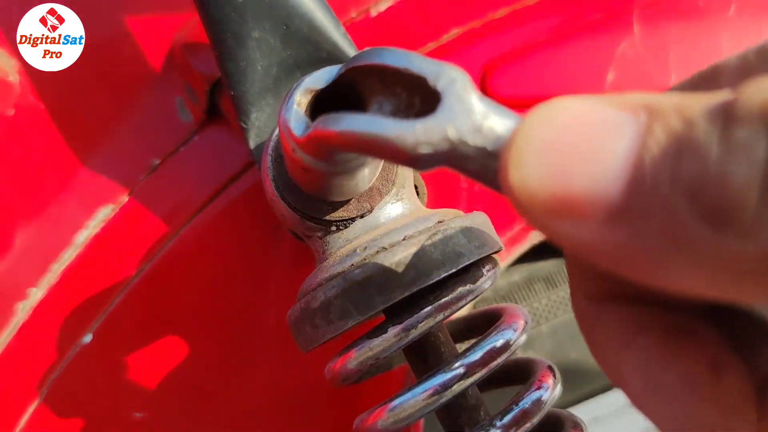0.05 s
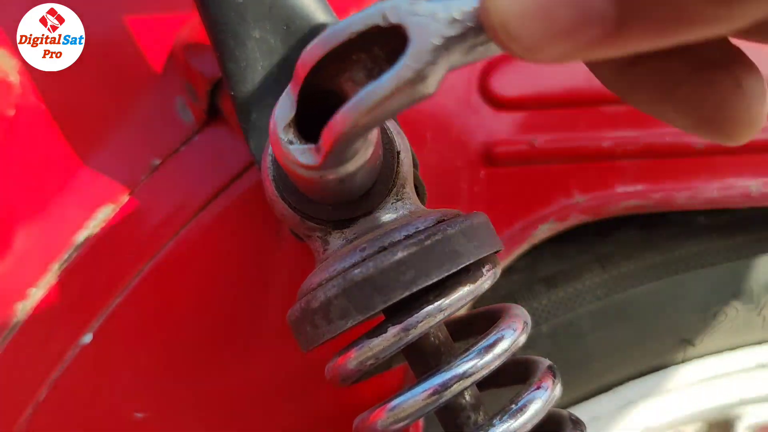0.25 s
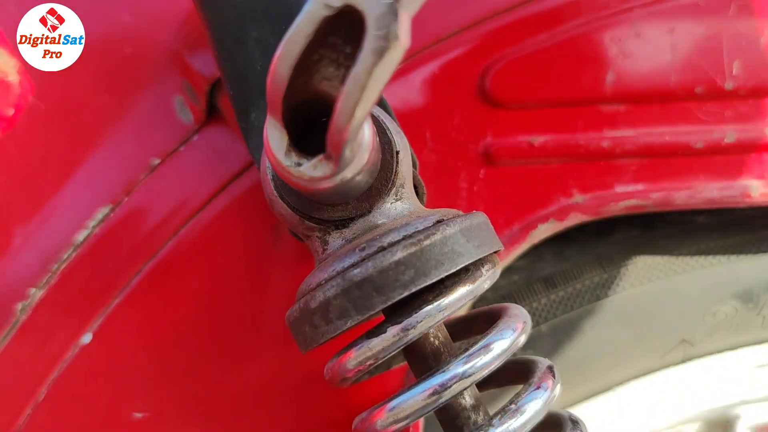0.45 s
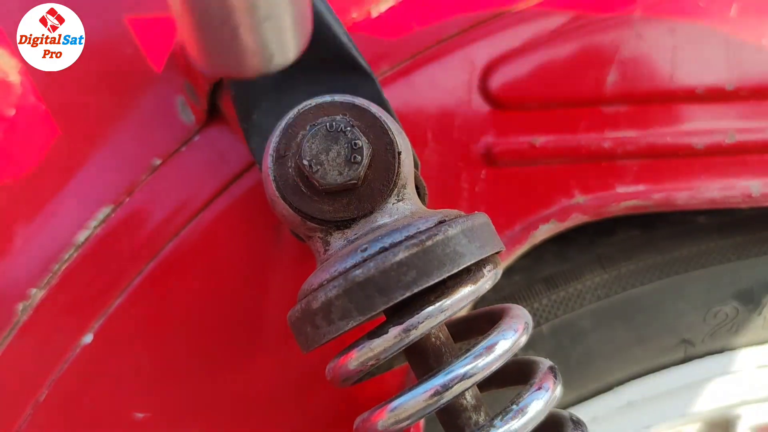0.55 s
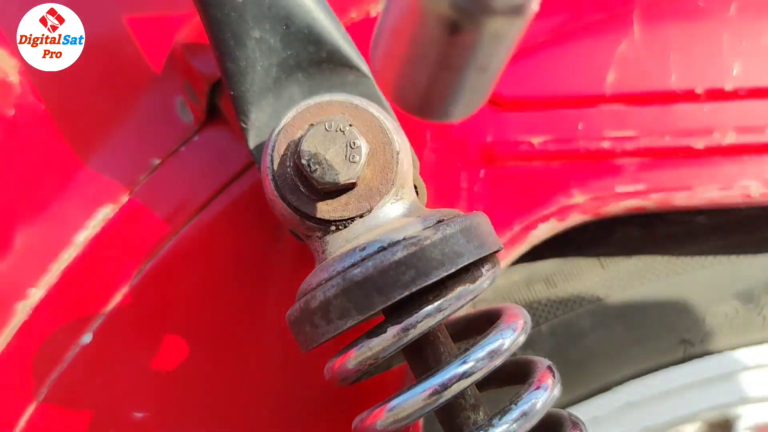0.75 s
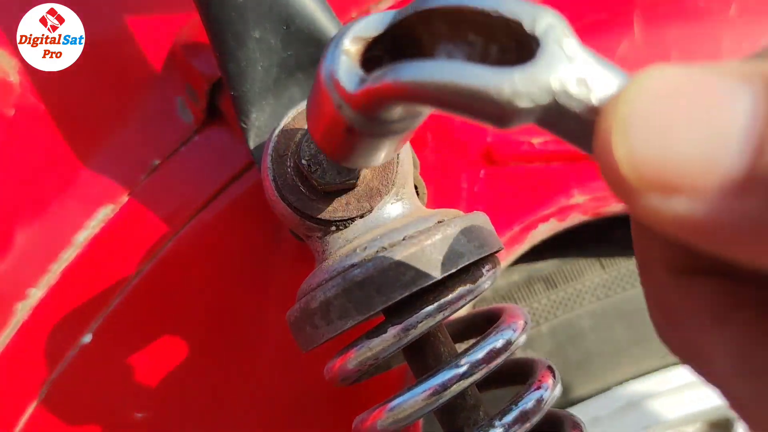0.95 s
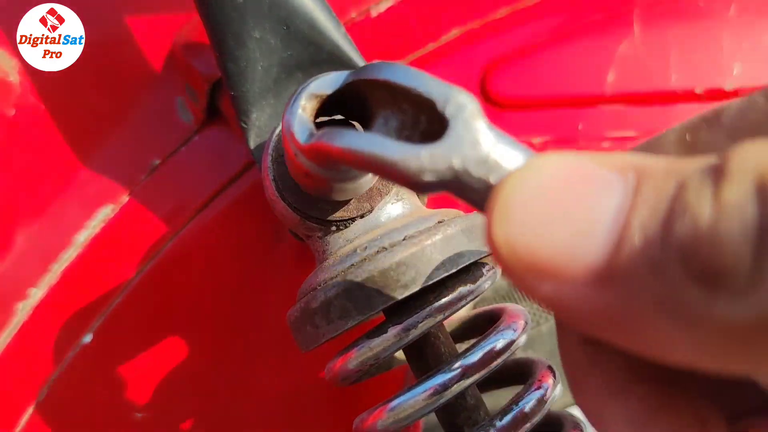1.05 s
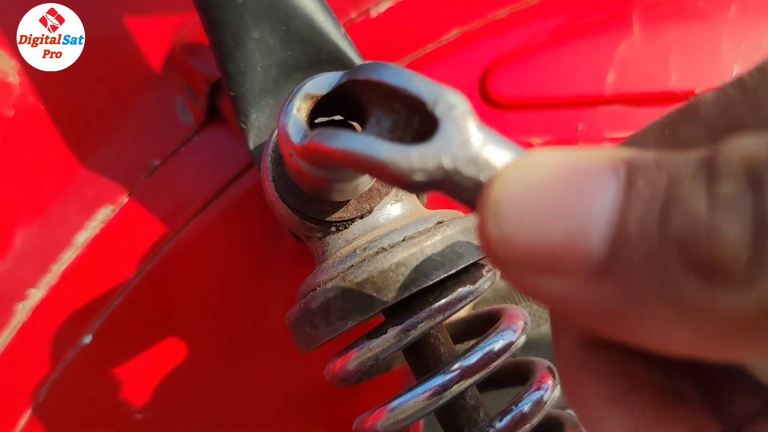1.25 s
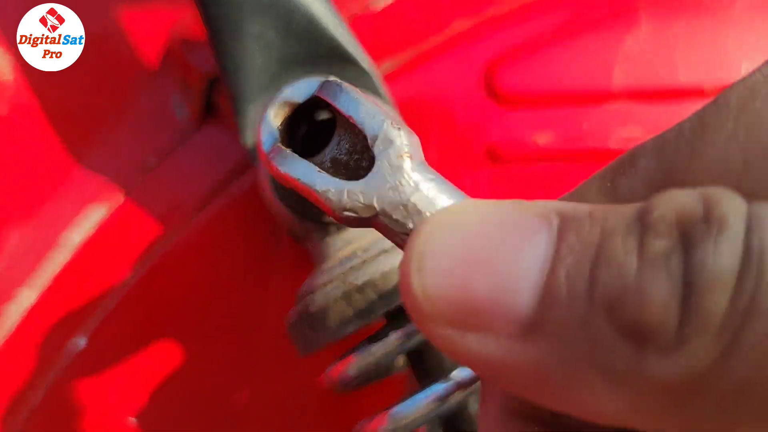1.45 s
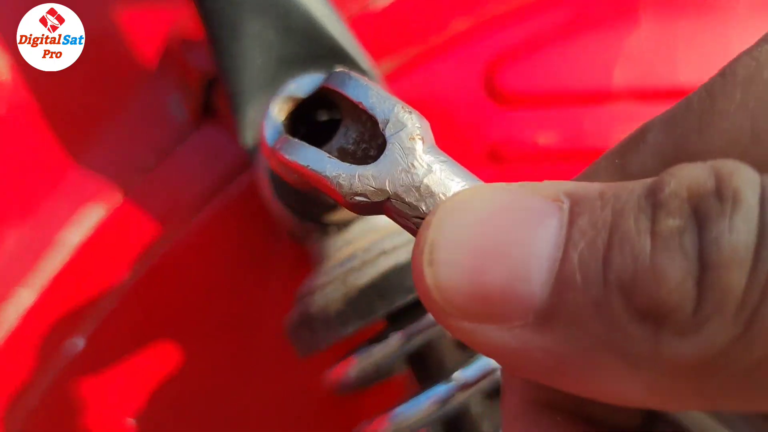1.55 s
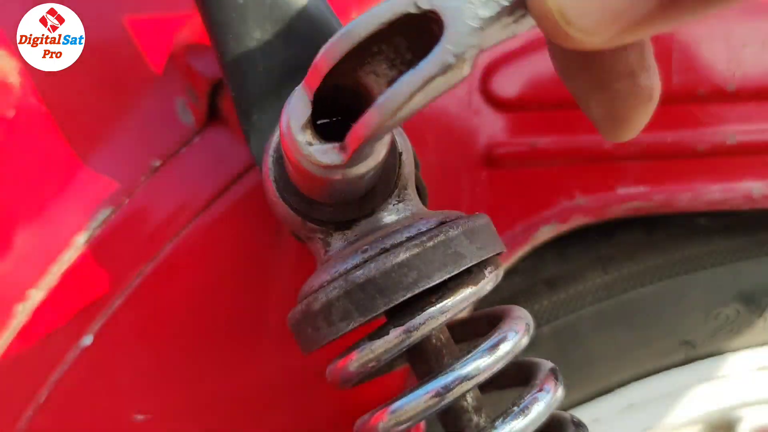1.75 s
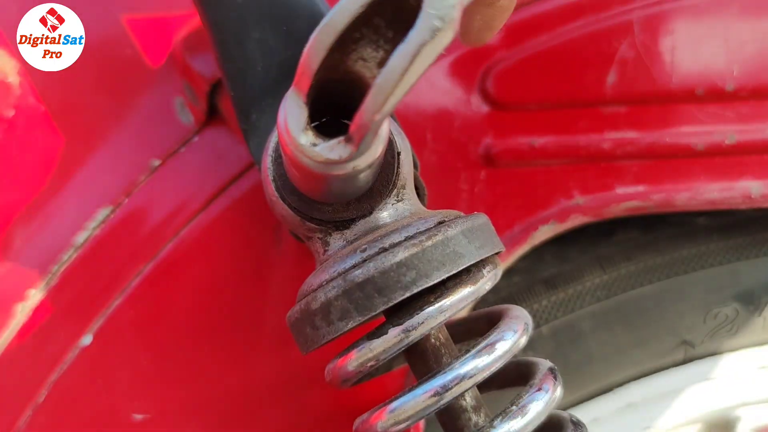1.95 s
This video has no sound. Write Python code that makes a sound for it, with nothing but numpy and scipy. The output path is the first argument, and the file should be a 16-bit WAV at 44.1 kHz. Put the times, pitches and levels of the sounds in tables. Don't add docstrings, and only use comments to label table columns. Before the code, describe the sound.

Metal socket tool clicks and knocks on a vehicle bolt, dry scrapes, faint dove cooing behind

```python
import sys
import numpy as np
from scipy import signal
from scipy.fft import rfft, irfft, next_fast_len
from scipy.io import wavfile
from scipy.ndimage import uniform_filter1d

SR = 44100
rng = np.random.default_rng(int(sys.argv[2]) if len(sys.argv) > 2 else 0)


def dump(signal):
    limited = np.clip(np.atleast_2d(signal).T, -1, 1)
    pcm = np.round(limited * 32767).astype(np.int16)
    wavfile.write(sys.argv[1], SR, pcm)


def voltage_ratio(decibels):
    exponent = np.asarray(decibels, float) / 20
    return 10 ** exponent


N = 88244


def unit(x):
    return x / np.sqrt(np.mean(x ** 2))


def band(x, hz, width):
    return signal.lfilter(*signal.iirpeak(min(hz, .45 * SR), hz / width, fs=SR), x)


def level_at(hz, points):
    p = np.array(points)
    return np.interp(np.log(hz), np.log(p[:, 0]), p[:, 1])


def colour(x, points):
    size = next_fast_len(N + 4096)
    f, p = np.arange(1025) * SR / 2048, np.array(points)
    log_gain = np.log(voltage_ratio(np.interp(np.log(f + 1), np.log(p[:, 0]), p[:, 1])))
    cepstrum = irfft(log_gain)
    cepstrum[1:1024] *= 2
    cepstrum[1025:] = 0
    response = rfft(irfft(np.exp(rfft(cepstrum))), size)
    return irfft(rfft(x, size) * response, size)[..., :N]


def walk(rate):
    k = int(SR / rate)
    steps = np.repeat(rng.standard_normal(N // k + 1), k)
    return 1.3 * uniform_filter1d(uniform_filter1d(steps, k), k)[:N]


# (start [s], length [s], level [dB], centre [Hz])
RUBS = [(-.05, 0.14, -44.5, 700), (0.214, 0.015, -47, 10800), (0.326, 0.1, -55, 8800),
        (0.066, 0.088, -54.5, 9000), (0.069, 0.17, -62, 3000), (0.2, 0.29, -72, 3800),
        (0.246, 0.23, -97, 8340), (0.434, 0.29, -65, 4560), (0.45, 0.21, -62.5, 7800),
        (1.38, 0.045, -77, 1900), (1.446, 0.11, -55, 8100), (1.656, 0.32, -67, 3210),
        (1.684, 0.28, -56.5, 9440), (1.961, 0.059, -63, 8600)]


def rubbing():
    grain_db, relative_width = 2.2, 0.56
    t, out = np.arange(N) / SR, 0
    grain_size = voltage_ratio(grain_db * rng.exponential(size=N) + 2.5 * walk(60))
    grains = unit(grain_size * rng.standard_normal((2, N)))
    for s, length, db, hz in RUBS:
        u = np.clip((t - s) / length, 0, 1)
        swell = np.sin(np.pi * u ** 0.62) ** 1.57
        width = relative_width * hz
        out = out + voltage_ratio(db) * swell * unit(band(band(grains, hz, width), hz, width))
    return out


# (pitch [Hz], density [dB per Hz])
TOWN = [(30, -9.5), (75, -2.5), (125, -2.5), (280, -6.5), (520, -14.5), (1200, -25), (4000, -35),
        (15000, -22)]
# (time [s], level [dB])
TOWN_GAIN = [(0, 3.5), (.3, 5), (.6, 1.5), (.89, -0.5), (.96, -1), (1.3, 0.5), (2, -1)]
# (centre [Hz], width [Hz], level [dB])
HUM = [(75.2, 9.5, -8), (117.6, 12, -8)]


def town():
    town_db, alike_hz = -57, 450
    out, gain = 0, np.array(TOWN_GAIN)
    for hz in 30 * 2 ** np.arange(0, 9.3, .5):
        mid, side = (unit(band(band(rng.standard_normal(N), hz, hz / 2), hz, hz / 2)) for _ in range(2))
        db = level_at(hz, TOWN) + 10 * np.log10(hz / 75) + 0.59 * walk(7.9)
        alike = 1 / (1 + (hz / alike_hz) ** 2)
        both = np.sqrt(1 + alike) * mid
        differ = np.sqrt(1 - alike) * side * np.array([[1], [-1]])
        out = out + voltage_ratio(db) * (both + differ)
    hum = sum(voltage_ratio(db) * unit(band(rng.standard_normal(N), hz, w)) for hz, w, db in HUM)
    return (unit(out) + hum) * voltage_ratio(town_db + np.interp(np.arange(N) / SR, gain[:, 0], gain[:, 1]))


# (time [s], loss [dB])
GRIPS = [(0.079, 11), (0.103, -2), (0.136, 16), (0.148, -11), (.18, 28), (.54, 3), (1.079, 9), (1.123, 5),
         (1.399, 8), (1.428, 8), (1.452, 20), (1.473, 8), (1.531, 4), (1.546, 9), (1.879, 8)]


def ring(x, modes):
    grip_s, longest_t60_s = 0.0013, .15
    chatter_db, chatter_rate = 2.2, 120
    port_turn, port_scatter, apart_hz = 2.39, 1, 763
    t, out = np.arange(N) / SR, 0
    choke = voltage_ratio(-sum(abs(db) * np.clip((t - s) / grip_s, 0, 1) for s, db in GRIPS))
    for k, (hz, db, t60) in enumerate(modes):
        longest = longest_t60_s * min(1, np.sqrt(900 / hz))
        r = np.exp(-np.log(1000) / (np.clip(t60, .005, longest) * SR))
        tone = choke * signal.lfilter([1], [1, -r * np.exp(2j * np.pi * hz / SR)], x / choke)
        tone = (-1) ** k * voltage_ratio(db + chatter_db * walk(chatter_rate)) * tone
        apart = (port_turn + (-1) ** (k // 2) * port_scatter) / (1 + (apart_hz / hz) ** 6)
        left = (tone * np.exp(.5j * apart)).imag
        right = (tone * np.exp(-.5j * apart)).imag
        out = out + np.array([left, right])
    return out


# (pitch [Hz], level [dB], time to fall 60 dB [s])
TOOL = [(2250, -9, 0.036), (2420, -1.5, 0.12), (2664, 2.5, 0.035), (2835, -4, 0.028), (2943, -5, 0.049),
        (3120, -8, .05), (3240, -2, 0.054), (3680, -9, 0.024), (3865, 4, 0.028), (4190, -12, 0.042),
        (5310, -12, 0.025), (5600, -8, .03), (8270, -8, 0.016), (14200, -27, .04)]
# (centre [Hz], width [Hz], level [dB])
GRIT = [(1060, 390, 6.5), (3000, 5960, 4.5), (7910, 620, 4.5), (13440, 5000, 0)]


def contacts(rows, panel):
    push_s, tick_s = 0.00039, .00008
    softer_when_weak = 0.47
    t = np.arange(N) / SR
    push, tick, spray = np.zeros(N), np.zeros(N), np.zeros(N)
    for s, panel_db, tool_db, grit_db, length in rows:
        i = int(s * SR)
        span = slice(i, i + 8000)
        u = t[span] - s + 1 / SR
        soft_s = push_s * voltage_ratio(-softer_when_weak * (panel_db + 28.5))
        push[span] += voltage_ratio(panel_db) * np.exp(-u / soft_s) / (soft_s * SR)
        tick[span] += voltage_ratio(tool_db) * np.exp(-u / tick_s) / (tick_s * SR)
        spray[span] += voltage_ratio(grit_db) * np.exp(-u / max(length, .001))
    grains = rng.standard_normal((2, N)) * voltage_ratio(2.9 * rng.exponential(size=N))
    grit = spray * unit(grains)
    grit_sound = sum(voltage_ratio(db) * band(grit, hz, w) for hz, w, db in GRIT)
    panel_ring = ring(push + voltage_ratio(-30) * grit[0], panel)
    tool_ring = ring(tick + voltage_ratio(-48) * grit[0], TOOL)
    return panel_ring + tool_ring + voltage_ratio(-3.5) * grit_sound


# (pitch [Hz], level [dB], time to fall 60 dB [s])
PANEL_DROP = [(197, -14, 0.092), (407, -16, 0.067), (454, -3.5, 0.067), (496, -1, 0.033),
              (551, -5.5, 0.061), (623.8, -5, 0.17), (749, -15, 0.083), (780, -10.5, 0.1), (843, -8, 0.048),
              (1028, -4, 0.18), (1264, -16, 0.1), (1425, -21.5, 0.11), (1970, -14.5, .08)]
# (time [s], panel level [dB], tool level [dB], grit level [dB], grit length [s])
DROPS = [(.001, -36, -70, -79, 0.03), (.0075, -43.5, -63, -70, .01), (.026, -39.5, -73, -79.5, .01),
         (1.0605, -20, -23, -23, 0.0034), (1.0632, -32.5, -26, -27.5, 0.0045),
         (1.066, -39, -18.5, -26, 0.0038), (1.0695, -35.5, -24, -38, 0.005),
         (1.0728, -20, -32.5, -29.5, 0.004), (1.0805, -34, -43, -39, .005),
         (1.086, -25.5, -49, -48, 0.0074), (1.094, -34.5, -46, -43, 0.0068),
         (1.101, -33.5, -53, -55, 0.0051), (1.118, -29.5, -60, -51.5, 0.0061)]


def socket_drops():
    return contacts(DROPS, PANEL_DROP)


# (pitch [Hz], level [dB], time to fall 60 dB [s])
PANEL_TURN = [(201, -13.5, 0.055), (455, -17.5, 0.023), (495.6, -1, 0.049), (667, -8, 0.021),
              (779, -10, 0.05), (1010, -6.5, 0.098), (1168, -12.5, 0.042), (1277, -16.5, 0.073),
              (1390, -12, 0.06), (1712, -14, 0.05), (2034, -18.5, 0.08), (2420, -14, .06),
              (2740, -25, 0.044), (2923, -24.5, .03)]
# (time [s], panel level [dB], tool level [dB], grit level [dB], grit length [s])
TURNS = [(.067, -34.5, -81, -68, 0.02), (.087, -33.5, -65, -57, 0.03), (.0925, -33.5, -73, -68, .01),
         (.11, -30, -46, -39, 0.0044), (.1153, -19, -45, -43, 0.0032), (.1205, -36, -45, -50, 0.0061),
         (.1277, -45.5, -57, -47.5, 0.018), (.1335, -22, -56.5, -56, 0.0043),
         (.1395, -32.5, -61.5, -49, 0.0039), (.145, -26, -61, -47, 0.0064), (.152, -30, -65.5, -52.5, .006),
         (.1585, -34.5, -64, -44, 0.0057), (.162, -31, -60.5, -48, .005), (.167, -23, -52, -47, 0.006),
         (.198, -39.5, -66, -57, 0.0072), (.218, -39, -69, -65, .006)]


def socket_turns():
    return contacts(TURNS, PANEL_TURN)


def whistles(rows, wobble):
    t, out, drift = np.arange(N) / SR, np.zeros(N), walk(35.9)
    for s, length, hz, end_hz, db in rows:
        u = np.clip((t - s) / length, 0, 1)
        f = (hz + (end_hz - hz) * u) * (1 + wobble * drift)
        swell = voltage_ratio(db - 6 + 2.1 * drift) * np.sin(np.pi * u) ** 0.5
        out += swell * np.sin(2 * np.pi * np.cumsum(f) / SR)
    return out


# (start [s], length [s], start pitch [Hz], end pitch [Hz], level [dB])
CHIRPS = [
    (.105, 0.081, 14200, 14250, -70),
    (.97, 0.078, 3700, 3680, -76),
    (1.0, 0.036, 3600, 3000, -69),
    (1.24, 0.1, 4600, 4540, -79),
]


def squeak_and_bird():
    return whistles(CHIRPS, wobble=0.0044)


# (start [s], length [s], start pitch [Hz], end pitch [Hz], level [dB])
COOS = [
    (.2, 0.14, 272, 282.4, -48),
    (.53, 0.086, 233.3, 247, -49),
    (1.26, 0.12, 282, 272, -45.5),
    (1.52, 0.114, 221.5, 266, -48),
    (1.67, 0.095, 275.4, 260, -45),
]


def dove():
    return whistles(COOS, wobble=0.01)


# (pitch [Hz], level [dB], time to fall 60 dB [s])
PANEL_LIFT = [(235.6, -12, 0.11), (472, -7, 0.083), (536, -7, 0.067), (689, -8.5, 0.12), (1106, -1.5, 0.14),
              (1410, -5, 0.053), (2040, -13, 0.092)]
# (time [s], panel level [dB], tool level [dB], grit level [dB], grit length [s])
LIFTS = [
    (.5075, -49.5, -55.5, -41.5, 0.0036),
    (.511, -31, -58, -35.5, 0.01),
    (.519, -65, -46, -68.5, 0.0056),
]


def socket_lifts():
    return contacts(LIFTS, PANEL_LIFT)


# (pitch [Hz], level [dB], time to fall 60 dB [s])
PANEL_PULL = [(218, -15.5, 0.036), (515.8, -2, 0.055), (670, -10.5, 0.067), (751, -6, 0.025),
              (1042, -14, 0.059), (1470, -24, 0.084), (2042, -14.5, 0.078), (2280, -20, 0.074),
              (2490, -15, 0.073), (2690, -34, 0.035)]
# (time [s], panel level [dB], tool level [dB], grit level [dB], grit length [s])
PULLS = [(1.383, -35.5, -88, -69, 0.018), (1.391, -45, -88, -70.5, 0.012), (1.407, -39.5, -85, -69, 0.0076),
         (1.418, -36.5, -80, -75, 0.005), (1.434, -33.5, -78, -66, 0.0085), (1.447, -48.5, -80, -68, .008),
         (1.462, -37, -78, -64, 0.0066), (1.482, -51, -72, -61, 0.011), (1.5055, -41, -67, -56, 0.01),
         (1.5105, -29, -68, -53.5, 0.0074), (1.5167, -19.5, -54, -52.5, 0.019),
         (1.534, -39.5, -62, -56, .008), (1.541, -39, -61, -66, 0.0093), (1.554, -43, -69, -66, 0.011),
         (1.8625, -37.5, -80, -63, 0.013)]


def second_pull():
    return contacts(PULLS, PANEL_PULL)


def echo(x):
    echo_db, t60_s, treble_t60_s = -12, .2, .08
    t = np.arange(SR // 2) / SR
    low, high = rng.standard_normal((2, 2, len(t)))
    low = signal.lfilter(*signal.butter(2, 1100, fs=SR), low[0] + .7 * low)
    tail = low * voltage_ratio(-60 * t / t60_s) + .45 * high * voltage_ratio(-60 * t / treble_t60_s)
    tail = tail / np.sqrt(np.sum(tail ** 2, axis=1, keepdims=True))
    return voltage_ratio(echo_db) * signal.fftconvolve(x[None], tail, axes=1)[:, :N]


def scene():
    radiates_hz = 228
    work = socket_turns() + second_pull() + socket_drops() + socket_lifts()
    work = signal.sosfilt(signal.butter(3, radiates_hz, "high", fs=SR, output="sos"), work)
    near = np.array([work[0], colour(work[1], [(6000, 1.5), (7800, -11)])])
    birds = dove() + squeak_and_bird()
    return near + echo(work[0]) + rubbing() + birds + town()


# (pitch [Hz], level [dB])
LEFT_PORT = [(100, 3), (4500, 4.5), (6500, -4.5), (7400, -1.5), (8200, 6), (9800, -6), (12000, -2.5),
             (15500, -12.5)]
# (pitch [Hz], level [dB])
RIGHT_PORT = [(100, 2.5), (700, 2.5), (1000, -0.5), (1500, 5), (4200, 5), (6200, -4), (7600, -23),
              (15000, -11)]


def microphone_ports(dry):
    return np.array([colour(dry[0], LEFT_PORT), colour(dry[1], RIGHT_PORT)])


def roll_off(x):
    return signal.sosfilt(signal.butter(12, 15830, fs=SR, output="sos"), x)


def record(dry):
    cut_s, resume_s, blip_db, top_hz = .8945, .9585, -54, 15800
    t = np.arange(N) / SR
    x = microphone_ports(dry)
    x = signal.sosfilt(signal.ellip(8, .2, 60, top_hz, fs=SR, output="sos"), x)
    gate = np.clip(np.maximum(cut_s - t, t - resume_s) / .001, 0, 1)
    blip = voltage_ratio(blip_db) * ((t > .9568) & (t < .9574))
    return roll_off(x * gate + blip)


dry = scene()
out = record(dry)
dump(out)
```